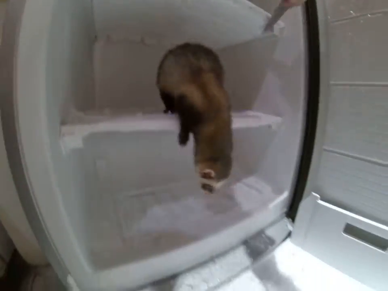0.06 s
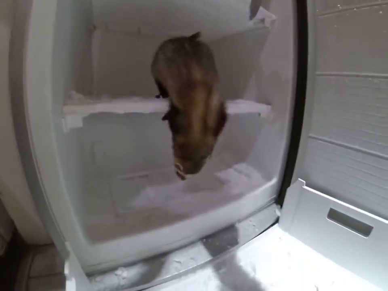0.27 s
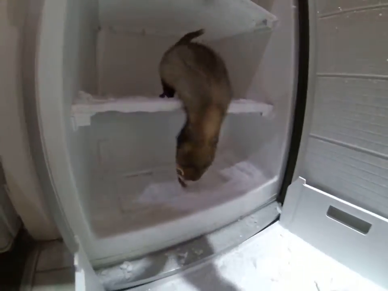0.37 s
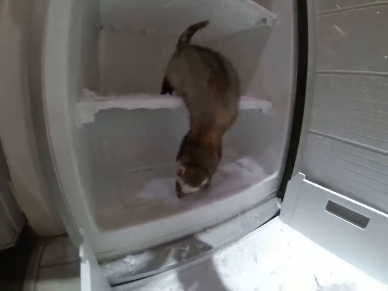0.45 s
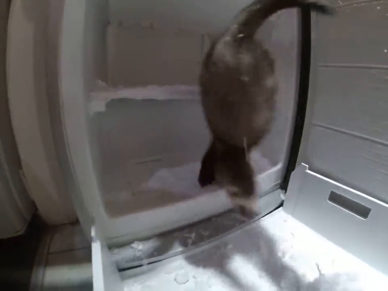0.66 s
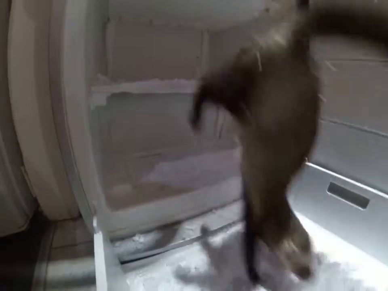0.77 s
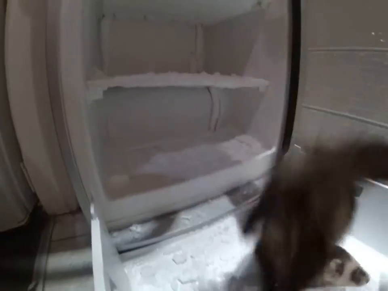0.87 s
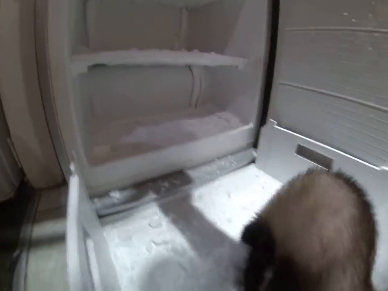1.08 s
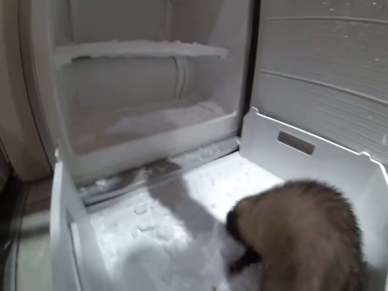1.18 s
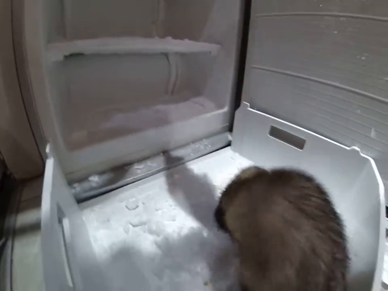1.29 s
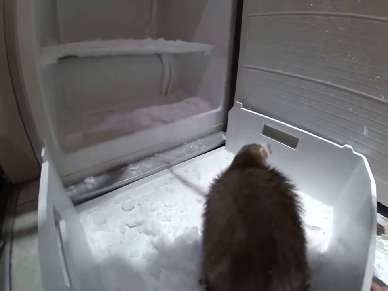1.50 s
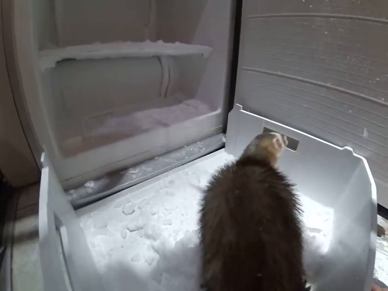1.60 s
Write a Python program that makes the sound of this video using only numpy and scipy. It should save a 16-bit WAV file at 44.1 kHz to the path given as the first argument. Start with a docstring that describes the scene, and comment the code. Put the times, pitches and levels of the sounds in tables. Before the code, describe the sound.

Frost crunches and scrapes under a ferret's paws, close up inside a freezer. A sharp crunch and hollow plastic thump come at about 0.2 seconds, with more scrabbling until 0.5. Lighter scratches and snaps follow. From 0.85 to 1.3 seconds dense crunching returns, with drawer thumps, tiny ice tinkles and a brief low rumble. It thins to faint crackles by 1.5 seconds, over a quiet, steady motor hum.

```python
"""Inside a freezer, a ferret slips off a frosted shelf, drops into a plastic drawer and scrabbles about.
Its paws crush and scrape frost in bursts of tiny fractures that ring briefly in the small compartment.
Its claws snap the crust and catch on the plastic, and its weight thumps the hollow drawer.
Loose bits of ice tinkle; a low motor hum lies underneath."""
import sys
import numpy as np
from scipy import signal
from scipy.fft import rfft, irfft
from scipy.io import wavfile
from scipy.ndimage import uniform_filter1d

SR = 44100
rng = np.random.default_rng(int(sys.argv[2]) if len(sys.argv) > 2 else 0)


def unload_audio(sound):
    """Save the sound as a 16-bit wav file, at the path given as the first command line argument."""
    columns = np.transpose(np.atleast_2d(sound))
    # keep every value between -1 and 1, then stretch to whole-number steps
    steps = np.round(np.clip(columns, -1, 1) * 32767)
    wavfile.write(sys.argv[1], SR, steps.astype(np.int16))


N = 72765

# belly and feet dragging over the frost: time_s, boom_db, scrape_db, crackle_db
BODY_DRAG = [(0, -58, -57, -51), (.12, -58, -59, -55), (.2, -42, -51, -56), (.245, -31, -38, -46),
             (.315, -39, -51, -54), (.38, -26, -41, -37), (.46, -30, -43, -44), (.52, -36, -45, -46),
             (.63, -46, -48, -44), (.73, -44, -47, -45), (.82, -47, -51, -49), (.88, -37, -36, -33),
             (.94, -41, -36, -34), (1.0, -27, -33, -27), (1.11, -31, -35, -30), (1.18, -33, -37, -39),
             (1.245, -35, -36, -33), (1.31, -41, -40, -40), (1.38, -46, -44, -45), (1.47, -52, -50, -50),
             (1.6, -56, -61, -60)]
# bright spectrum of breaking frost: frequency_hz, level_db
CRACKLE_SPECTRUM = [(1400, -30), (2400, -10), (3300, -1.2), (4300, -3.3), (6200, 1), (8000, -3),
                    (11800, -4.5), (13300, -14), (16000, -27)]
DRAG_GRAINS_PER_S, DRAG_SPREAD_DB, FRACTURE_SPREAD_DB = 1800, 5, 4


def undb(db):
    """Decibels to gain."""
    return 10 ** (np.asarray(db) / 20)


def unit(x):
    """Scale to rms 1."""
    return x / np.sqrt(np.mean(x ** 2))


def steady(x, window_s=.008):
    """Even out the level, keeping the fine grain."""
    power = uniform_filter1d(x ** 2, int(window_s * SR))
    return x / np.sqrt(np.abs(power) + 1e-9)


def fader(rows, column=1):
    """Gain over time from one dB column of a table."""
    rows = np.array(rows)
    return undb(np.interp(np.arange(N) / SR, rows[:, 0], rows[:, column]))


def add(out, start_s, sound):
    """Mix a sound in at a given time."""
    at = int(start_s * SR)
    part = sound[:max(N - at, 0)]
    out[at:at + len(part)] += part


def through(x, response):
    """Pass a sound through an impulse response."""
    return signal.fftconvolve(x, response)[:len(x)]


def colour(spectrum, size=1024):
    """Minimum-phase EQ response of unit energy with the given spectrum."""
    hz, db = np.array(spectrum).T
    bins_hz = np.maximum(np.arange(size // 2 + 1) * SR / size, 1)
    gain = undb(np.interp(np.log(bins_hz), np.log(hz), db))
    cepstrum = irfft(np.log(gain))
    cepstrum[1:size // 2] *= 2
    cepstrum[size // 2 + 1:] = 0
    response = irfft(np.exp(rfft(cepstrum)))
    return response / np.linalg.norm(response)


def ring(modes, pitch=1, size=10000):
    """Decaying modes after one blow."""
    t = np.arange(size) / SR
    return sum(undb(db - 60 * t / t60) * np.sin(2 * np.pi * hz * pitch * t) for hz, db, t60 in modes)


def grains(per_s, spread_db, size=N):
    """Tiny fractures of uneven size, at a steady overall level."""
    strength = undb(spread_db * np.minimum(rng.exponential(size=size), 3))
    clicks = (rng.random(size) < per_s / SR) * strength * rng.choice([-1, 1], size)
    return steady(clicks + .1 * rng.standard_normal(size))


def wash(t60_s, tail_db, size=4096):
    """A direct impulse followed by dense, fading reflections."""
    t = np.arange(size) / SR
    tail = rng.standard_normal(size) * undb(-60 * t / t60_s)
    return (t == 0) + undb(tail_db) * tail / np.linalg.norm(tail)


def contact_spot():
    """A very short smear that gives each point of contact its own colour."""
    return wash(t60_s=.007, tail_db=1, size=512)


def compartment():
    """Response of the freezer: direct sound, a short wash of reflections and wall resonances."""
    # resonances of the walls: pitch_hz, width_hz, gain_db
    walls = [(665, 45, -5), (940, 50, -7), (1400, 130, -8), (2000, 130, -9), (2330, 110, -11),
             (3950, 50, -6), (4980, 60, -5), (5330, 60, -1), (6080, 120, -6), (6450, 120, -5)]
    response = wash(t60_s=.045, tail_db=-12)
    t = np.arange(len(response)) / SR
    for hz, width_hz, db in walls:
        decay = undb(db) * 2 * np.pi * width_hz / SR * np.exp(-np.pi * width_hz * t)
        response += decay * np.cos(2 * np.pi * hz * t)
    return response / np.linalg.norm(response)


def motor_hum(pitch_hz=99, level_db=-46.5):
    """The motor lays a steady low tone under the scene."""
    return undb(level_db) * np.sqrt(2) * np.sin(2 * np.pi * pitch_hz * np.arange(N) / SR)


def loose_ice(chatter_s=.005, low_cut_hz=4200, size=2000):
    """Loose pieces of ice ring high and short, chattering as they touch."""
    # pieces touching: start_s, level_db, pitch_ratio
    tinks = [(.1325, -23, 1.02), (.957, -22, 1.05), (1.043, -21, 1.12), (1.048, -21, .93),
             (1.067, -21, 1.0), (1.128, -17, 1.21), (1.1475, -19, 1.22)]
    # modes of a piece of ice: pitch_hz, level_db, t60_s
    ice_modes = [(4931, -11, .04), (5400, 0, .026), (6056, -9, .04), (7200, -7, .024), (8800, -14, .028)]
    out, age = np.zeros(N), np.arange(size) / SR
    low_cut = signal.butter(3, low_cut_hz, "high", fs=SR, output="sos")
    for start, db, pitch in tinks:
        chatter = rng.standard_normal(size) * (age / chatter_s) ** .5 * np.exp(-2 * age / chatter_s)
        tone = ring(ice_modes, pitch, size=4000)
        tink = signal.sosfilt(low_cut, through(tone, chatter))
        add(out, start, undb(db) * tink * np.linalg.norm(tone) / np.linalg.norm(tink))
    return out


def drawer_rumble():
    """The drawer rumbles as it shifts under the ferret's weight."""
    # deep spectrum of the rumble: frequency_hz, level_db
    spectrum = [(15, -14), (45, -2), (80, 0), (130, -7), (300, -30)]
    # the drawer shifting: time_s, level_db
    shifts = [(.2, -53), (.24, -39), (.31, -47), (.42, -37), (.5, -42), (.8, -51), (.87, -38), (.93, -52),
              (1.0, -44), (1.15, -41), (1.265, -28), (1.46, -52)]
    return unit(through(rng.standard_normal(N), colour(spectrum, size=4096))) * fader(shifts)


def hollow_plastic(attack_s=.003, spread_octaves=.36, thump_trim_db=1, boom_trim_db=.5):
    """Soft blows thump the plastic, each favouring the modes near one pitch; dragging makes it boom."""
    # modes of the shelf and drawer: pitch_hz, level_db, t60_s
    modes = [(84, -3, .17), (103, -4, .1), (121, 0, .16), (160, -2, .11), (190, -2, .15), (230, 0, .12),
             (265, 0, .14), (357, -5, .11), (441, -3, .15)]
    # weight landing on the plastic: start_s, level_db, favoured_pitch_hz
    thumps = [(.157, -31, 110), (.186, -28, 160), (.192, -33, 420), (.224, -22, 130), (.238, -10, 260),
              (.265, -24, 200), (.328, -27, 120), (.355, -19, 440), (.363, -13.5, 120), (.389, -16, 140),
              (.394, -17, 240), (.413, -19, 110), (.438, -18, 230), (.458, -26, 380), (.525, -29, 110),
              (.664, -25, 225), (.855, -30, 110), (.968, -16.5, 105), (.985, -18, 250), (1.015, -16, 135),
              (1.05, -20, 235), (1.105, -24, 210), (1.15, -25, 170)]
    out = np.zeros(N)
    mode_hz, mode_db, _ = np.array(modes).T
    rings = np.array([ring([mode]) for mode in modes])
    attack = np.clip(np.arange(rings.shape[1]) / SR / attack_s, 0, 1)
    for start, db, favoured_hz in thumps:
        share = np.exp(-.5 * (np.log2(mode_hz / favoured_hz) / spread_octaves) ** 2)
        thump = attack * (share @ rings) / np.linalg.norm(share * undb(mode_db))
        add(out, start, undb(db + thump_trim_db) * thump)
    boom = unit(through(grains(DRAG_GRAINS_PER_S, DRAG_SPREAD_DB), rings.sum(0)))
    return out + undb(boom_trim_db) * fader(BODY_DRAG) * boom


def claw_catches(slip_s=.009, ring_cycles=42, size=4000):
    """A claw sticks and slips for a moment and rings one spot of the plastic."""
    # claws catching: start_s, level_db, pitch_hz
    catches = [(.2225, -24, 947), (.2225, -23, 1630), (.354, -18, 452), (.381, -22, 452), (.416, -20, 2380),
               (.436, -21, 2040), (.563, -31, 1600), (.66, -28, 2430), (.79, -32, 1370), (.927, -27, 1380),
               (.996, -23, 2050), (1.206, -18, 673), (1.212, -23, 980), (1.309, -27, 1480)]
    out, age = np.zeros(N), np.arange(size) / SR
    for start, db, hz in catches:
        slips = grains(DRAG_GRAINS_PER_S, FRACTURE_SPREAD_DB, size) * np.exp(-(age / slip_s) ** 2)
        resonance = ring([(hz, 0, ring_cycles / hz)], size=size) * np.clip(age * hz, 0, 1)
        tone = through(slips, resonance)
        add(out, start, undb(db) * np.sqrt(2) * tone / np.abs(tone).max())
    return out


def crust_snaps(t60_s=.014, crumbs_per_s=110, crumb_trim_db=-6, size=1000):
    """Brittle crust breaks with a short, bright crack; dragging knocks off small crumbs."""
    # crust snapping under a claw: start_s, level_db
    snaps = [(.2228, -18), (.4172, -21), (.677, -23), (.7, -30), (.7128, -25), (.7517, -26), (.8198, -32),
             (.8278, -30), (.9358, -18), (1.0635, -15), (1.159, -25), (1.203, -20), (1.2385, -23)]
    out, bright = np.zeros(N), colour(CRACKLE_SPECTRUM)
    fade = undb(-60 * np.arange(size) / SR / t60_s)
    for start, db in snaps:
        add(out, start, undb(db) * through(rng.standard_normal(size) * fade, bright))
    breaks = (rng.random(N) < crumbs_per_s / SR) * rng.uniform(-1, 1, N)
    tick = rng.standard_normal(size) * fade ** 2
    crumbs = unit(through(through(breaks, tick), bright))
    return out + undb(crumb_trim_db) * fader(BODY_DRAG, column=3) * crumbs


def belly_drag(colours, contacts=4, top_hz=12800, knock_trim_db=.5, crackle_trim_db=-1):
    """Dragging rubs fine crackle out of the frost at several spots, with the top end rolled off."""
    out, per_s = np.zeros(N), DRAG_GRAINS_PER_S / contacts
    scrape, crackle = fader(BODY_DRAG, column=2), fader(BODY_DRAG, column=3)
    gains = [undb(knock_trim_db) * scrape, scrape, undb(crackle_trim_db) * crackle]
    high_cut = signal.butter(4, top_hz, fs=SR, output="sos")
    for gain, eq in zip(gains, colours):
        rubbing = sum(through(grains(per_s, DRAG_SPREAD_DB), contact_spot()) for _ in range(contacts))
        out += gain * unit(signal.sosfilt(high_cut, through(rubbing, eq)))
    return out


def paw_crunches(colours, fractures_per_s=5000, attack_s=.0015, trim_db=-1.2, size=5000):
    """Each paw sets off a burst of fractures, coloured by the spot it lands on."""
    # paws crushing frost: start_s, hold_s, fade_s (per 20 dB), knock_db, scrape_db, crackle_db
    crunches = [ (.183, .004, .025, -42, -45, -42), (.215, .007, .008, -36, -36, -26),
                (.2208, .005, .012, -19, -23, -16), (.3326, .002, .012, -40, -43, -35),
                (.3455, .008, .02, -33, -32, -25), (.353, .024, .035, -25, -29, -21),
                (.385, .022, .025, -29, -42, -29), (.4148, .009, .025, -33, -27, -19),
                (.432, .021, .018, -32, -27, -26), (.531, .018, .03, -38, -40, -38),
                (.561, .011, .022, -44, -34, -39), (.589, .004, .02, -48, -44, -34),
                (.659, .005, .012, -38, -30, -19), (.676, .003, .016, -37, -35, -28),
                (.7118, .003, .016, -48, -40, -27), (.7505, .004, .025, -44, -37, -35),
                (.777, .018, .02, -45, -45, -39), (.836, .005, .01, -46, -43, -33),
                (.8475, .014, .02, -30, -37, -26), (.858, .008, .025, -24, -36, -31),
                (.877, .02, .03, -32, -31, -21), (.934, .005, .02, -36, -29, -24),
                (.954, .011, .03, -33, -27, -16), (.969, .018, .04, -20, -26, -22),
                (.997, .018, .04, -24, -24, -22), (1.041, .028, .028, -31, -30, -19.5),
                (1.071, .003, .018, -28, -25, -28), (1.123, .012, .03, -35, -32, -29),
                (1.201, .009, .025, -30, -25, -19), (1.212, .011, .025, -27, -27, -24),
                (1.3085, .004, .015, -33, -28, -33), (1.316, .003, .02, -20, -24, -35),
                (1.419, .009, .03, -47, -48, -35), (1.443, .004, .025, -42, -42, -36),
                (1.4925, .006, .025, -48, -46, -41), (1.5455, .004, .022, -35, -44, -35)]
    out, age = np.zeros(N), np.arange(size) / SR
    for start, hold_s, fade_s, *levels_db in crunches:
        force = np.clip(age / attack_s, 0, 1) * undb(-20 * np.maximum(age - hold_s, 0) / fade_s)
        spot = contact_spot()
        for db, eq in zip(levels_db, colours):
            crush = through(grains(fractures_per_s, FRACTURE_SPREAD_DB, size), through(eq, spot))
            add(out, start, undb(db + trim_db) * force * steady(crush))
    return out


def frost():
    """Crunching and dragging, each layered from knock, scrape and crackle, ring the compartment."""
    # dull knock of the plastic: frequency_hz, level_db
    knock = [(100, -18), (250, -4), (420, -1), (680, -1.5), (950, -6.5), (1300, -19), (2500, -45)]
    # midrange scrape of the claws: frequency_hz, level_db
    scrape = [(600, -32), (950, -6), (1350, 0), (2200, -3), (2900, -8), (4000, -17), (8000, -40)]
    colours = [colour(spectrum) for spectrum in (knock, scrape, CRACKLE_SPECTRUM)]
    return through(paw_crunches(colours) + belly_drag(colours), compartment())


def scene():
    """All sources close up, in mono."""
    ferret = frost() + crust_snaps() + claw_catches() + hollow_plastic()
    return (ferret + drawer_rumble() + loose_ice() + motor_hum())[None]


def record(dry):
    """Roll off the deepest bass and cut the very top steeply."""
    low_cut = signal.butter(2, 32, "high", fs=SR, output="sos")
    high_cut = signal.ellip(10, .2, 80, 15500, fs=SR, output="sos")
    return signal.sosfilt(high_cut, signal.sosfilt(low_cut, dry))


dry = scene()
out = record(dry)
unload_audio(out)
```